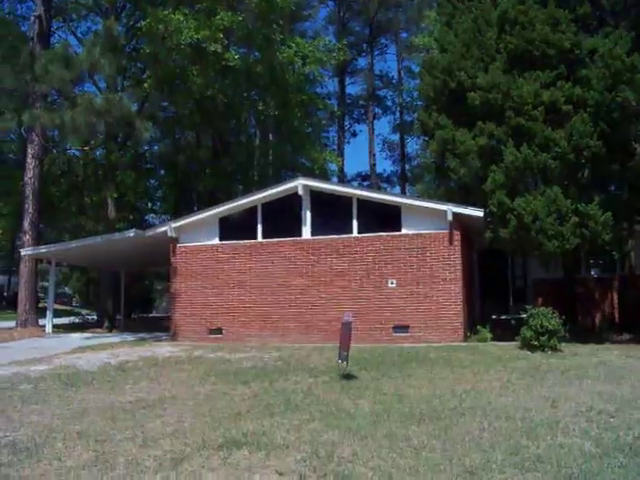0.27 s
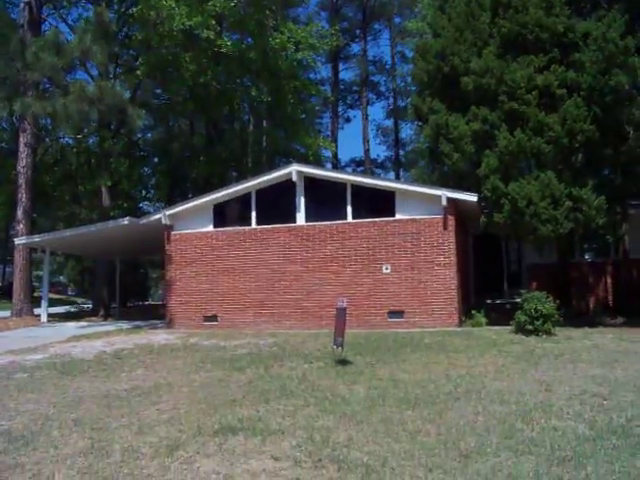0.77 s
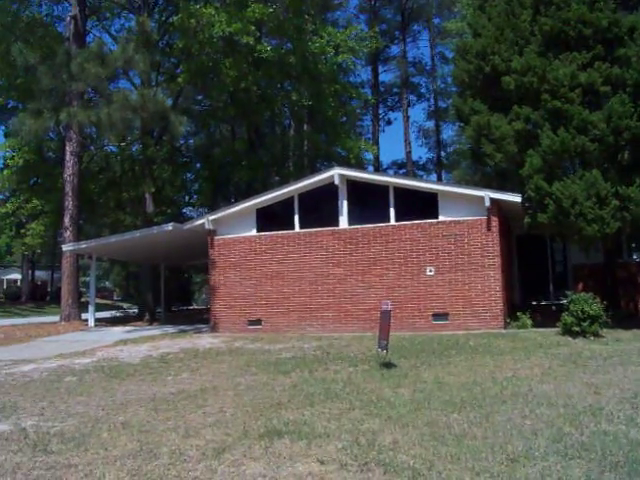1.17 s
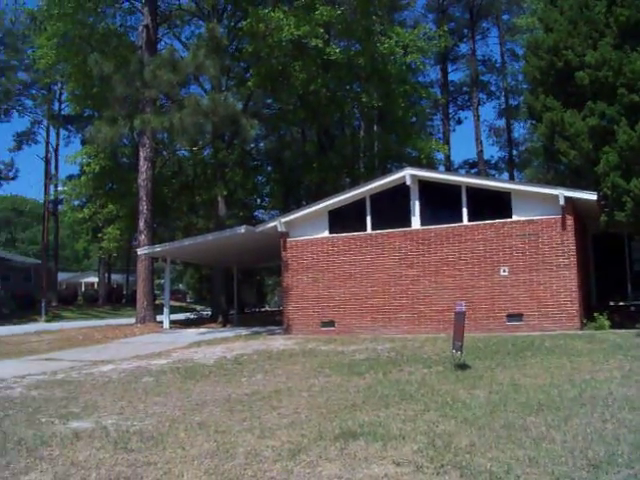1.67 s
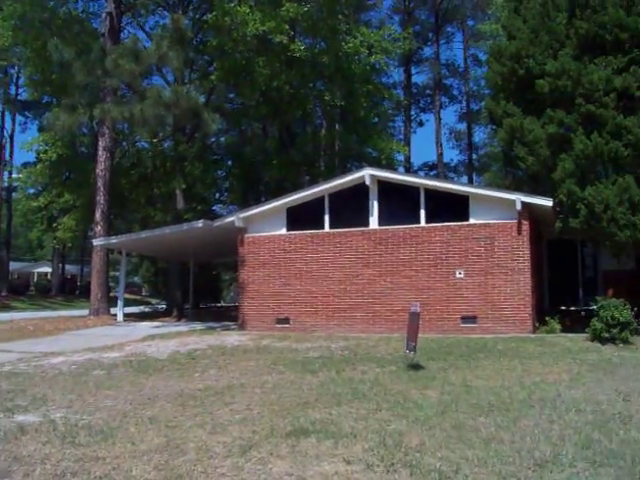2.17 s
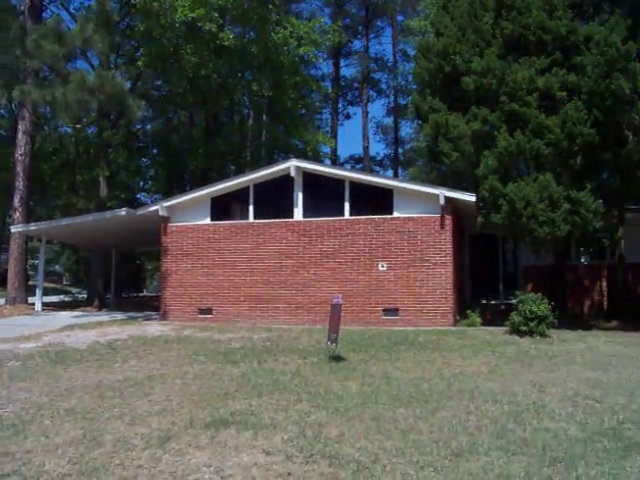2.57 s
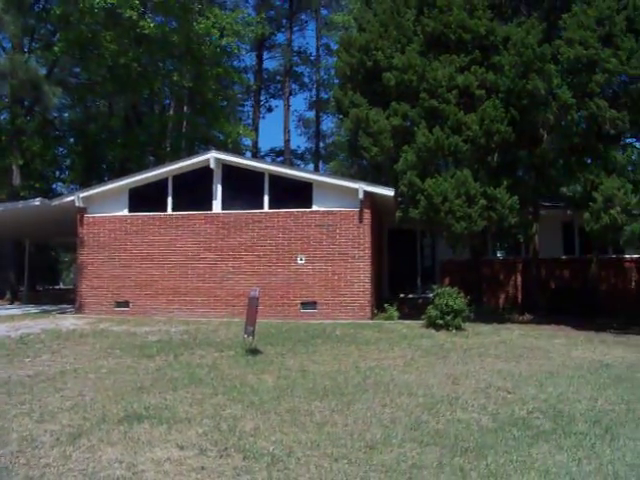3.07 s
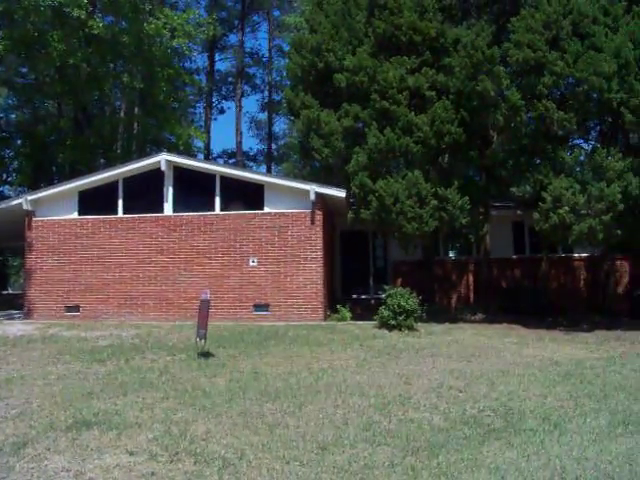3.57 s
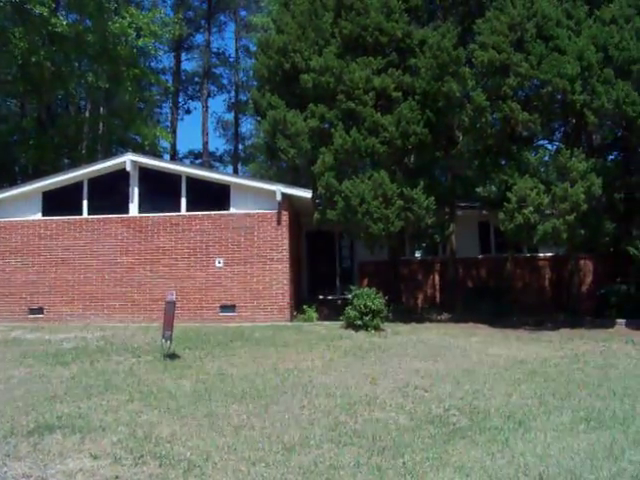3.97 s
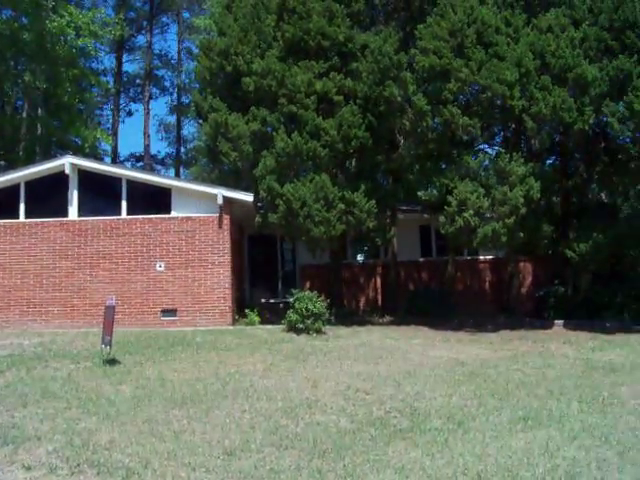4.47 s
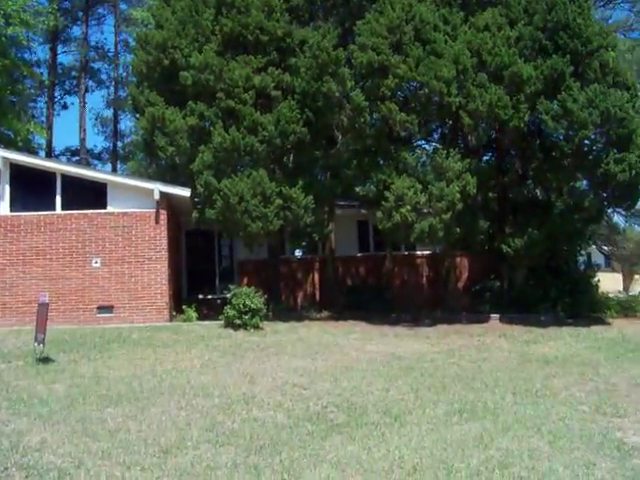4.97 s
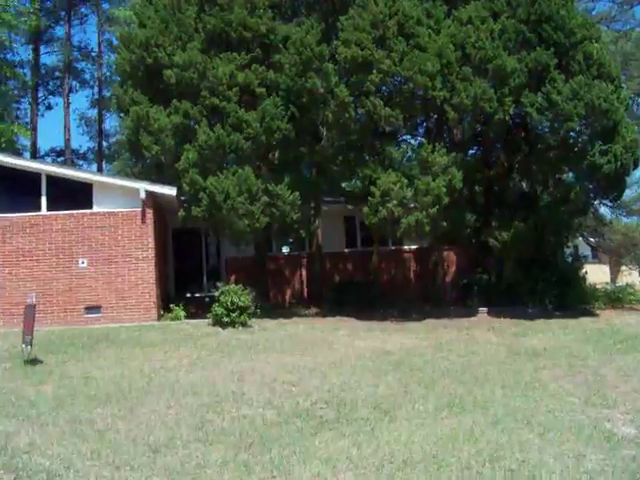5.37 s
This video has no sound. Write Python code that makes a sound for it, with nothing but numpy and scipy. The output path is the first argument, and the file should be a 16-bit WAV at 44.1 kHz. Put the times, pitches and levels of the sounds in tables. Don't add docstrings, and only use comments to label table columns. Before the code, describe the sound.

Low motor hum with airy exhaust roar rises past a quiet lawn, peaks, falls in pitch; handling clicks near start and end.

```python
import sys
import numpy as np
from scipy import signal
from scipy.fft import rfft, irfft
from scipy.io import wavfile

SR = 44100
rng = np.random.default_rng(int(sys.argv[2]) if len(sys.argv) > 2 else 0)


def linear_from_db(decibels):
    return 10 ** (np.asarray(decibels, float) / 20)


def generate_wav(signal):
    frames = np.transpose(np.atleast_2d(signal))
    scaled = np.clip(frames, -1, 1) * 32767
    pcm = np.round(scaled).astype(np.int16)
    wavfile.write(sys.argv[1], SR, pcm)


N = 247842


def in_time(rows):
    s, *columns = np.transpose(rows)
    return [np.interp(np.arange(N) / SR, s, column) for column in columns]


def rms_one(x):
    return x / np.sqrt(np.mean(x ** 2) + 1e-20)


def drift(rate_hz):
    coarse = 20
    settle = 4000
    pole = np.exp(-2 * np.pi * rate_hz * coarse / SR)
    noise = rng.standard_normal(N // coarse + settle + 2)
    slow = signal.lfilter([1], [1, -2 * pole, pole * pole], noise)[settle:]
    return np.interp(np.arange(N) / coarse, np.arange(len(slow)), rms_one(slow))


def coloured_noise(spectrum, patchy_db, rate_hz):
    hz, level_db = np.transpose(spectrum)
    grid_hz = np.maximum(np.fft.rfftfreq(N, 1 / SR), 1)
    colour_db = np.interp(np.log(grid_hz), np.log(hz), level_db, -90, -90)
    shaped = rfft(rng.standard_normal(N)) * linear_from_db(colour_db)
    thirds = 3 * np.log2(grid_hz)
    together = drift(rate_hz / 4)
    out = np.zeros(N)
    for centre in np.arange(np.floor(3 * np.log2(hz[0])), 3 * np.log2(hz[-1]) + 1):
        overlap = np.cos(np.pi / 2 * np.clip(thirds - centre, -1, 1)) ** 2
        flicker_db = patchy_db * (0.26 * together + drift(rate_hz))
        out += irfft(shaped * overlap, N) * linear_from_db(flicker_db)
    return rms_one(out)


def layer_gain(mix, swings_db):
    return linear_from_db(mix[0] + np.dot(mix[1:], swings_db))


# multiple of the firing rate, level_db
OVERTONES = [(0.5, -59.5), (1.5, -43), (2, -32.5), (2.5, -51), (3, -41), (4, -42), (5, -44.5)]
# pitch_hz, level_db
PIPE_COLOUR = [(125, -1.5), (165, 3.5), (186, 2.5), (197, -5), (225, -5.5), (265, -3.5), (290, -17.5),
               (450, -24)]
# centre_s, length_s, multiple, level_db
ECHO_FADES = [(0.69, 0.2, 2, -3), (2.3, 0.3, 2, 4.5), (2.607, 0.2, 2, -7), (2.9, 0.26, 2, -5),
              (3.21, 0.27, 2, 4), (3.48, 0.13, 2, -4), (4.71, 0.25, 2, 3), (4.85, 0.11, 2, -4),
              (5.2, 0.46, 2, -6), (0.85, 0.35, 1.5, 3), (1.6022, 1, 1.5, -2), (2.875, 0.49, 1.5, -27),
              (3.35, 0.62, 1.5, 4.5), (5.5, 0.5, 1.5, -5.5), (0.58, 0.24, 3, 2), (0.58, 0.43, 4, 14),
              (0.6, 0.44, 5, 14.5), (2.9, 0.15, 2, 1.5), (4.316, 0.28, 2, -2.5), (1.11, 0.25, 2, 2),
              (0.45, 0.73, 2.5, 9), (3.53, 0.27, 2, 0.5), (4.61, 0.19, 3, 6.5)]


def firing_tone(rate_hz, turns, note_db):
    s = np.arange(N) / SR
    pipe_hz, pipe_db = np.transpose(PIPE_COLOUR)
    follow_db = 0.39 * (note_db - note_db.mean())
    orders = [(1, note_db)]
    for k, level_db in OVERTONES:
        fade_db = np.zeros(N)
        for centre_s, length_s, order, depth_db in ECHO_FADES:
            if order == k:
                fade_db += depth_db * np.exp(-4 * ((s - centre_s) / length_s) ** 2)
        colour_db = np.interp(np.log(k * rate_hz), np.log(pipe_hz), pipe_db)
        orders.append((k, level_db + colour_db + fade_db + follow_db))
    uneven = 0.006 * drift(5)
    out = np.zeros(N)
    for k, level_db in orders:
        waver = linear_from_db(0.22 * min(k, 2) * drift(2.9))
        out += np.sqrt(2) * linear_from_db(level_db) * waver * np.cos(2 * np.pi * k * (turns + uneven))
    return out


# pitch_hz, level_db (per Hz)
RUMBLE_COLOUR = [(20, -38.5), (40, -13), (60, -8.5), (100, 1), (160, -4), (240, -5), (290, -7.5),
                 (340, -27)]
DRONE_COLOUR = [(260, -27.5), (320, 0), (355, 3), (400, -2.5), (520, 0), (600, -0.5), (660, -7.5),
                (760, -22.5)]
BURR_COLOUR = [(560, -27.5), (640, -3.5), (700, 1), (760, -5.5), (850, -28.5)]
RASP_COLOUR = [(580, -31), (680, -10.5), (740, -3.5), (950, -3.5), (1180, -4.5), (1550, -8), (1750, -12),
               (2100, -16)]
# level_db, then shares (dB per dB) of load, airflow, breeze, note
RUMBLE_LEVEL = (-41.5, -0.12, 0.76, 0.45, -0.03)
DRONE_LEVEL = (-50.5, 0.34, 0.45, 0.41, -0.11)
BURR_LEVEL = (-53.5, 1.2, 1.3, -0.3, -0.1)
RASP_LEVEL = (-42.5, 1.16, -0.16, -0.06, -0.06)


def roar(turns, swings_db):
    puff = np.cos(2 * np.pi * turns)
    rumble = layer_gain(RUMBLE_LEVEL, swings_db) * coloured_noise(RUMBLE_COLOUR, -0.5, 8.8)
    drone = layer_gain(DRONE_LEVEL, swings_db) * coloured_noise(DRONE_COLOUR, 1.0, 2)
    burr = layer_gain(BURR_LEVEL, swings_db) * coloured_noise(BURR_COLOUR, 0.7, 12)
    rasp = layer_gain(RASP_LEVEL, swings_db) * coloured_noise(RASP_COLOUR, 0.63, 6.4)
    return rumble + drone + burr * (1 + 0.3 * puff) + rasp * (1 + 0.12 * puff)


# pitch_hz, level_db (per Hz)
RUSH_COLOUR = [(1200, -29.5), (1700, -4.5), (2200, 1.5), (2800, -2), (3500, -11.5), (4300, -13.5),
               (5200, -37)]
WHOOSH_COLOUR = [(2500, -25), (2900, -0.5), (3300, 1.5), (3800, -3.5), (4500, -26)]
HISS_COLOUR = [(3500, -19), (4500, 0), (5500, -2), (6200, -0.5), (6700, 1.5), (7200, -4.5), (7700, -30.5)]
SIZZLE_COLOUR = [(6900, -18.5), (7400, -8.5), (8000, -10.5), (8500, -6.5), (8900, -38)]
# level_db, then shares (dB per dB) of load, airflow, breeze, note
RUSH_LEVEL = (-48.5, -0.04, 1.01, 0.01, 0.0042)
WHOOSH_LEVEL = (-58, 0.48, 0.76, 1.23, 0.03)
HISS_LEVEL = (-60, 0.4, 0.1, 1.08, 0.17)
SIZZLE_LEVEL = (-69, 0.4, -0.44, 0.06, 0.79)


def air(turns, swings_db):
    puff = np.cos(2 * np.pi * turns)
    rush = layer_gain(RUSH_LEVEL, swings_db) * coloured_noise(RUSH_COLOUR, 0.78, 13)
    whoosh = layer_gain(WHOOSH_LEVEL, swings_db) * coloured_noise(WHOOSH_COLOUR, 1.4, 5)
    hiss = layer_gain(HISS_LEVEL, swings_db) * coloured_noise(HISS_COLOUR, 0.35, 25)
    sizzle = layer_gain(SIZZLE_LEVEL, swings_db) * coloured_noise(SIZZLE_COLOUR, 2.0, 40)
    return rush * (1 + 0.047 * puff) + whoosh + hiss * (1 + 0.063 * puff) + sizzle * (1 + 0.25 * puff)


# start_s, peak level_db, bright pitch_hz, low ring level_db, thump level_db
CLICK_EVENTS = [
    (0.2312, -25, 5430, -23, -18),
    (0.315, -22, 5500, 9, -4.5),
    (0.3379, -28, 4700, -2, -10),
    (5.1173, -33, 6530, -25, -28),
    (5.1217, -41, 6380, -23, -11),
    (5.132, -30, 6496, -24, -19),
    (5.1323, -25.5, 5800, -23, -13),
    (5.138, -20.5, 5920, -5.5, -4.5),
    (5.143, -43.5, 6205, -12, -2),
]
# from pitch_hz, to pitch_hz, decay_s (T60)
CASING_REGIONS = [
    (1050, 1600, 0.005),
    (2500, 3600, 0.005),
    (230, 520, 0.008),
]


def casing_clicks():
    age_s = np.arange(2000) / SR
    snap = 9.0 * (np.arange(len(age_s)) == 30)
    onset = np.minimum(age_s / 0.0024, 1)
    spread, bright_t60_s = 1.22, 0.0065
    signs = (1, 1, -1, 1)
    shares = (1, 0.4, 0.7, 0.15)
    out = np.zeros(N)
    for start_s, peak_db, bright_hz, low_db, thump_db in CLICK_EVENTS:
        at = round(start_s * SR)
        contacts = rng.standard_normal(len(age_s))
        regions = [(bright_hz / spread, bright_hz * spread, bright_t60_s)] + list(CASING_REGIONS)
        levels_db = [0, low_db, -8 + 0.15 * low_db, thump_db]
        for (from_hz, to_hz, t60_s), level_db, sign, share in zip(regions, levels_db, signs, shares):
            push = (share * contacts + snap) * onset * linear_from_db(-60 * age_s / t60_s)
            region = signal.butter(2, [from_hz, to_hz], "band", fs=SR, output="sos")
            ring = signal.sosfilt(region, push)
            out[at:at + len(age_s)] += sign * linear_from_db(peak_db + level_db) * ring / np.abs(ring).max()
    return signal.sosfilt(signal.butter(8, 7300, fs=SR, output="sos"), out + 1e-18)


# centre_s, length_s, multiple of the firing rate, level_db
SINGING_ORDERS = [(1.0, 0.25, 13, -48.5), (1.1, 0.18, 9, -58), (1.1, 0.27, 3.5, -55.5), (1.4, 0.21, 8, -57),
                  (1.6, 0.55, 4.5, -59), (2.0, 0.3, 4, -60.5), (2.02, 0.12, 8, -47), (2.1, 0.5, 5, -57),
                  (2.1, 0.21, 7.5, -46.5), (2.1, 0.15, 14, -46), (2.3, 0.19, 14.5, -48),
                  (2.45, 0.13, 14, -46.5), (2.5, 0.16, 4, -51.5), (2.52, 0.08, 16.2, -46.5),
                  (2.7, 0.25, 30.5, -57), (2.45, 0.1, 7.5, -52), (2.95, 0.2, 7, -55), (4.15, 0.2, 4, -60),
                  (4.9, 0.68, 5.5, -56.5), (5.3, 1, 6.2, -54.5), (5.3, 0.34, 3.75, -59.5)]


def singing(turns):
    s = np.arange(N) / SR
    flutter_db = 2.2 * drift(18)
    wobble = 0.09 * drift(28)
    out = np.zeros(N)
    for n, (centre_s, length_s, k, level_db) in enumerate(SINGING_ORDERS):
        near = np.flatnonzero(np.abs(s - centre_s) < 1.5 * length_s)
        own = (near + 20000 * n) % N
        swell = np.exp(-4 * ((s[near] - centre_s) / length_s) ** 2)
        tone = np.cos(2 * np.pi * k * turns[near] + k * wobble[own])
        out[near] += np.sqrt(2) * linear_from_db(level_db + flutter_db[own]) * swell * tone
    return out


# start_s, extra path delay_ms, reflection share (0-1)
NEAR_SURFACE = [
    (5.15, 0.1, 0.0),
    (5.2, 0.16, 0.3),
    (5.27, 0.27, 0.4),
    (5.34, 0.36, 0.45),
    (5.42, 0.4, 0.0),
]


def near_reflection(x):
    delay_ms, share = in_time(NEAR_SURFACE)
    treble = signal.sosfilt(signal.butter(1, [600, 3500], "band", fs=SR, output="sos"), x)
    echo = np.interp(np.arange(N) - delay_ms * SR / 1000, np.arange(N), treble)
    return x + np.clip(share, 0, 1) * (echo - 0.14 * treble)


# start_s, firing pitch_hz
ENGINE_SPEED = [(0.24, 82.06), (0.55, 87.66), (0.94, 91.2), (1.4, 96.64), (1.8, 98.3), (2.2, 102.6),
                (2.48, 106.7), (2.76, 105.8), (3.2, 107.7), (3.6, 107.9), (4.02, 109.9), (4.44, 111.5),
                (4.74, 111.8), (4.85, 108.1), (4.96, 101.1), (5.08, 94.5), (5.56, 93.9)]
# start_s, level_db
NOTE_LEVEL = [(0.24, -35), (0.4, -35), (0.45, -30), (0.98, -28.5), (1.06, -33.5), (1.34, -29), (1.59, -34),
              (2.44, -24.5), (2.77, -28.5), (2.81, -24.5), (3.05, -23.5), (3.23, -27), (3.38, -23),
              (3.64, -30), (4.35, -19), (4.83, -22.5), (5.13, -33), (5.58, -34)]
# start_s, exhaust load_db, airflow_db, breeze_db
ENGINE_EFFORT = [(0.4, -43.5, -51.5, -63.5), (0.69, -42.5, -50.5, -63.5), (1.01, -43, -50.5, -60.5),
                 (1.19, -41, -50, -61), (1.53, -42.5, -48.5, -63.5), (1.83, -43, -49, -65),
                 (2.09, -41, -47, -61.5), (2.32, -39.5, -46, -60.5), (2.66, -39.5, -46, -59.5),
                 (3.05, -40, -44, -60), (3.67, -43, -45.5, -59), (3.93, -42.5, -44, -59),
                 (4.21, -41.5, -46, -58.5), (4.67, -44, -47.5, -58), (4.96, -44.5, -45.5, -58.5),
                 (5.22, -43.5, -51, -57), (5.58, -46, -51.5, -57.5)]


def scene():
    rate_hz, = in_time(ENGINE_SPEED)
    note_db, = in_time(NOTE_LEVEL)
    controls_db = np.array(in_time(ENGINE_EFFORT) + [note_db])
    swings_db = controls_db - controls_db.mean(axis=1, keepdims=True)
    turns = np.cumsum(rate_hz) / SR
    engine = firing_tone(rate_hz, turns, note_db) + roar(turns, swings_db) + singing(turns)
    passing = near_reflection(engine + air(turns, swings_db))
    return (passing + casing_clicks())[None]


def band_limit(x):
    return signal.sosfilt(signal.butter(12, 8840, fs=SR, output="sos"), x)


# pitch_hz, width_hz, depth (0-1)
MICROPHONE_DIPS = [
    (298, 42, 1),
    (977, 69, 1),
]


def record(dry):
    x = dry
    for hz, width_hz, depth in MICROPHONE_DIPS:
        peak = signal.iirpeak(hz, hz / width_hz, fs=SR)
        x = x - min(depth, 1) * signal.lfilter(*peak, x)
    x = signal.sosfilt(signal.cheby2(8, 50, 9500, fs=SR, output="sos"), x)
    start_s = 0.2052
    x = x * (np.arange(N) >= start_s * SR)
    return band_limit(x)


dry = scene()
out = record(dry)
generate_wav(out)
```